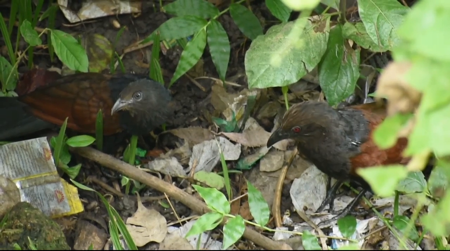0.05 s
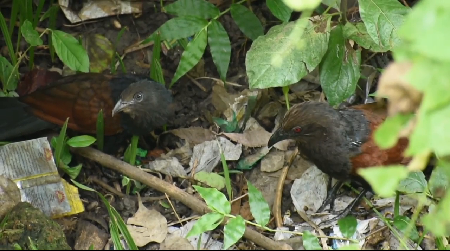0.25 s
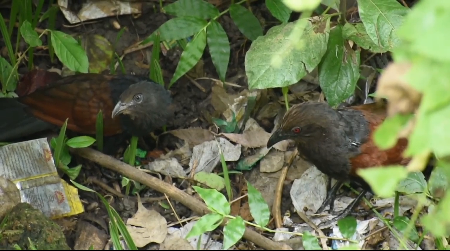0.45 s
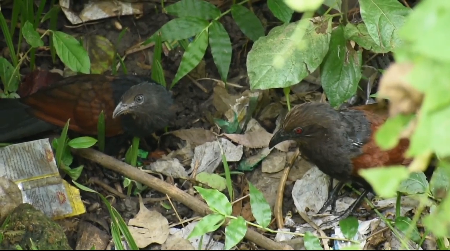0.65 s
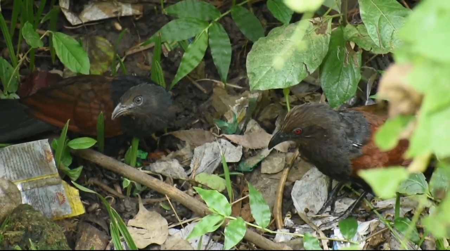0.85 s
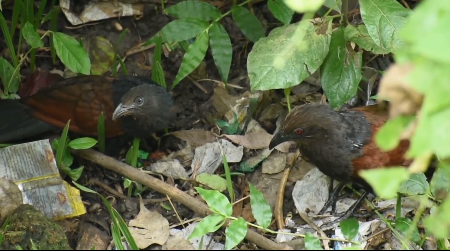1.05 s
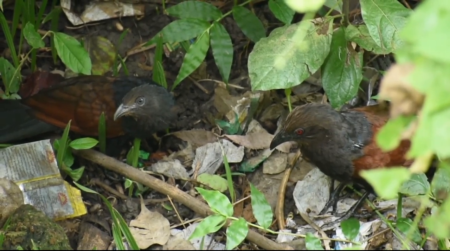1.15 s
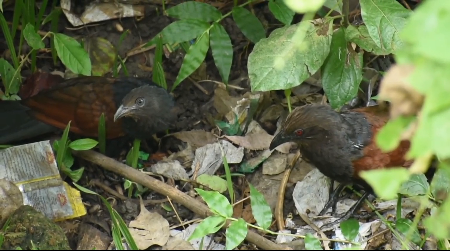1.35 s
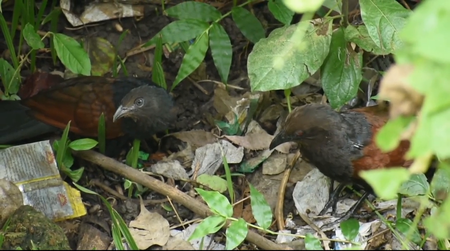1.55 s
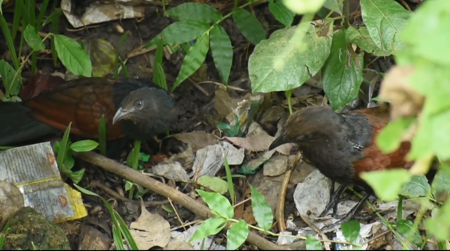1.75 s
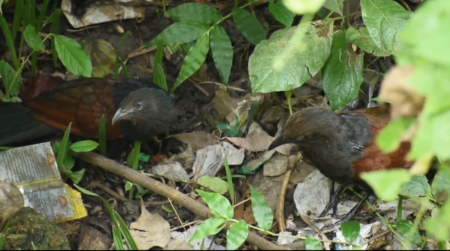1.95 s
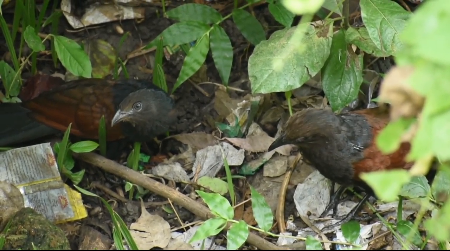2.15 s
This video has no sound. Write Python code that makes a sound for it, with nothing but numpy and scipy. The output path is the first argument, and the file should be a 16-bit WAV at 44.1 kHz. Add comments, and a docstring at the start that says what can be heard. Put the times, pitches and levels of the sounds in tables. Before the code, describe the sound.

Several birds call in undergrowth, with small tweets scattered throughout. A close bird hoots low at about 0.2 and 0.6 seconds, the loudest sounds. Five evenly paced chirps run until 1.3 seconds, with high pips on the left. Two thin squeals come near 1 and 1.2 seconds, and a farther bird rasps at 1 and 1.6 seconds. Light wind rumbles on the microphone over a soft hiss.

```python
"""In undergrowth, on a stereo microphone; light wind rumbles on it and foliage gives each call a short tail.
Small birds tweet, chirp and zip from the start. A coucal, close by, hoots low twice in the first second,
with pips and a peep off to the left. Around the one-second mark come two thin squeals, and a farther
bird gives the first of two rasping calls; scattered tweets carry on to the end.
The recorder's crude change of sample rate adds faint metallic images to every call."""
import sys
import numpy as np
from scipy import signal
from scipy.fft import rfft, irfft
from scipy.io import wavfile
from scipy.ndimage import uniform_filter1d, map_coordinates

SR = 44100
rng = np.random.default_rng(int(sys.argv[2]) if len(sys.argv) > 2 else 0)


def materialize(psi):
    """Save the field psi as 16-bit PCM at rate SR to the path in sys.argv[1].

    A 1-D psi becomes a single channel; in a 2-D psi each row is a channel.
    """
    bounded = np.clip(np.atleast_2d(psi).T, -1, 1)
    quanta = np.round(bounded * 32767).astype(np.int16)
    wavfile.write(sys.argv[1], SR, quanta)


N = 97020
LEAD = SR // 4  # samples of run-in, so that earlier calls still echo at the start
TIME = np.arange(N) / SR


def amp(db):
    """Decibels to amplitude."""
    return 10 ** (np.asarray(db) / 20)


def unit(x):
    """Scales to rms 1."""
    return x / np.sqrt(np.mean(x ** 2) + 1e-20)


def at_hz(points, hz):
    """Reads a spectrum on a log-frequency axis."""
    f, value = np.transpose(points)
    return np.interp(np.log(hz + 1), np.log(f + 1), value)


def follow(points):
    """Start time and each column of a curve, sample by sample."""
    s, *columns = np.transpose(points)
    t = np.arange(s[0], s[-1], 1 / SR)
    return s[0], [np.interp(t, s, c) for c in columns]


def drift(size, hz):
    """Random wander below hz, of rms about 1."""
    f = np.fft.rfftfreq(SR, 1 / SR)
    return unit(irfft(rfft(rng.standard_normal(SR)) / (1 + (f / hz) ** 4)))[:size]


def pan(balance_db):
    """Left and right gains; positive leans left."""
    return np.array([amp(balance_db / 2), amp(-balance_db / 2)])


def add(mix, start, sound, balance_db, lead_s=0):
    """Places a sound; it reaches the left channel lead_s before the right."""
    right = map_coordinates(sound, [np.arange(len(sound)) - lead_s * SR], order=3)
    part = mix[:, LEAD + round(start * SR):][:, :len(sound)]
    part += (pan(balance_db)[:, None] * [sound, right])[:, :part.shape[1]]


def noise_pair(spectrum, likeness, balance_db, patchy_db):
    """Two partly alike channels of coloured noise with drifting patches, at rms 1."""
    hz = np.fft.rfftfreq(2048, 1 / SR)
    a, b, c, d, patches = rng.standard_normal((N // 512 + 5, len(hz), 5)).T
    patches = unit(uniform_filter1d(uniform_filter1d(patches, size=24, axis=0), size=5, axis=1))
    alike = np.clip(at_hz(likeness, hz), -1, 1)[:, None]
    left = a + 1j * b
    right = alike * left + np.sqrt(1 - alike ** 2) * (c + 1j * d)
    gain = amp(at_hz(spectrum, hz)[:, None] + patchy_db * patches) * pan(at_hz(balance_db, hz))[..., None]
    return unit(signal.istft(gain * [left, right], nperseg=2048, noverlap=1536)[1][:, :N])


def air():
    """Soft hiss of air and leaves all around."""
    spectrum = [(70, -32.5), (120, -5), (225, -5), (340, -5), (490, -5), (700, -10), (1100, -12.5),
                (1700, -14), (2500, -15.5), (3700, -19), (4800, -19.5), (11000, -27), (15500, -28.5)]  # hiss colour: f/Hz, relative density/dB
    likeness = [(100, 0.074), (500, 0.2), (1500, 0.51), (5000, 0.18), (15000, 0.16)]  # stereo image: f/Hz, left-right correlation
    balance = [(100, 1), (500, 1), (2000, 1.6), (15000, 1.6)]  # lean: f/Hz, left over right/dB
    swell = [(0, -55), (.3, -52.5), (.7, -54.5), (.84, -53.5), (1.02, -51.5), (1.24, -54.5), (1.42, -53.5),
             (1.8, -56.5), (2.2, -57.5)]  # rise and fall: t/s, level/dB
    return noise_pair(spectrum, likeness, balance, patchy_db=3) * amp(np.interp(TIME, *np.transpose(swell)))


def wind():
    """Lumpy wind on the microphone, mostly on the left port."""
    spectrum = [(8, -1.5), (25, 2.5), (45, -8), (65, -15.5), (100, -21.5), (160, -34), (400, -74),
                (2000, -100)]  # rumble colour: f/Hz, relative density/dB
    gusts = [(0, -46), (.08, -45.5), (.17, -46), (.24, -46.5), (.42, -47.5), (.72, -44), (.95, -47.5),
             (1.03, -32), (1.2, -43.5), (1.39, -38), (1.58, -44.5), (1.77, -42.5), (1.86, -46.5),
             (2.03, -33.5), (2.2, -50.5)]  # gust strength: t/s, relative level/dB
    rumble = noise_pair(spectrum, likeness=[(25, 0.71), (120, 0.23)],
                        balance_db=[(30, 10.1), (120, 5.2)], patchy_db=2.5)
    return rumble * amp(5 + np.interp(TIME, *np.transpose(gusts)))


def whistle(hz, level_db, octave_db, rough=0, edge_s=.002, jitter=.0013):
    """A nearly pure syrinx tone with a weak octave and soft ends; roughness makes its strength flutter."""
    t = np.arange(len(hz)) / SR
    phase = 2 * np.pi * np.cumsum(hz * (1 + jitter * drift(len(hz), hz=236))) / SR
    edges = np.clip(np.minimum(t, t[-1] - t) / edge_s, 0, 1)
    flutter = (1 + rough * drift(len(hz), hz=200)) / np.hypot(1, rough)
    overtone = amp(octave_db + 47 * np.log2(hz / hz.mean()))  # grows as the note is pushed higher
    return flutter * edges * amp(level_db) * np.sqrt(2) * (np.sin(phase) + overtone * np.sin(2 * phase))


def foliage(dry, wet_db, near_db, near_s=.017, gap_s=.0088, echoes_per_s=2500):
    """Adds quick echoes from the nearest leaves, then the scatter from farther ones, dying band by band."""
    decay = [(200, 0.33), (400, 0.47), (2500, 0.57), (5000, 0.6), (8000, 0.3), (15000, 0.57)]  # tail of the leaves: f/Hz, time to fall 60 dB/s
    size = SR // 2
    t = np.arange(size) / SR
    taps = rng.choice([-1., 1.], (2, size)) * (rng.random((2, size)) < echoes_per_s / SR) * (t > gap_s)
    hz, s, bands = signal.stft(taps, SR, nperseg=256)
    tail = signal.istft(bands * amp(-60 * s / at_hz(decay, hz)[:, None]), SR, nperseg=256)[1][:, :size]
    near = rng.standard_normal((2, size)) * (t > .001) * (t < near_s)
    echoes = (amp(wet_db) * unit(tail) + amp(near_db) * unit(near)) / np.sqrt(size)
    return (dry + signal.fftconvolve(dry, echoes, axes=1)[:, :dry.shape[1]])[:, LEAD:LEAD + N]


def bird(shape, calls, balance_db, octave_db, wet_db, near_db, lead_s=0, rough=0):
    """One bird in the leaves whistles its shape, scaled to each call's length, pitch and strength."""
    out = np.zeros((2, LEAD + N))
    s, hz, db = np.transpose(shape)
    for start, length, ratio, level_db in calls:
        shape_s = np.linspace(0, s[-1], round(length * SR))
        pitch = uniform_filter1d(np.interp(shape_s, s, hz), size=len(shape_s) // 16)
        note = whistle(ratio * pitch, level_db + np.interp(shape_s, s, db), octave_db, rough)
        add(out, start, note, balance_db, lead_s)
    return foliage(out, wet_db, near_db)


def coucal(echo_s=.052, echo_db=-31):
    """Low hoots close to the microphone, each thrown back once by the undergrowth."""
    shape = [(0, 365, -29.5), (.004, 373, -15.5), (.009, 420, -7.5), (.014, 437, -3.5), (.02, 431, -1.7),
             (.033, 382.5, 1), (.046, 356, 1.1), (.064, 354.2, 0.4), (.096, 376.8, 3), (.108, 396, -2.5),
             (.114, 360, -12), (.121, 335, -37.5)]  # one hoot: t/s, f/Hz, relative level/dB
    calls = [(-.132, 0.12, 1.04, -15), (.228, 0.12, 1, -18), (.56, 0.12, .968, -19)]  # hoots: t/s, length/s, pitch ratio, level/dB
    hoots = bird(shape, calls, balance_db=5.4, octave_db=-38.5, wet_db=-22.5, near_db=-35.5)
    echo = np.array([np.interp(TIME - echo_s, TIME, side, left=0) for side in hoots])
    return hoots + amp(echo_db) * echo


def tweets():
    """Brief gliding notes from birds scattered through the bushes."""
    # Notes: t/s, length/s, first f/Hz, middle f/Hz, last f/Hz, mid-note level/dB, left over right/dB
    notes = [(-.02, 0.081, 4600, 5130, 6500, -56, 12), (-.01, 0.036, 3710, 3540, 3320, -59, 10),
             (0.622, 0.05, 3360, 3380, 3160, -57, 8.5), (0.071, 0.017, 3420, 3371, 3250, -55, 11),
             (0.123, 0.012, 3440, 3330, 3240, -56.5, 20), (0.177, 0.019, 3430, 3374, 3430, -55.5, 11.5),
             (0.234, 0.0099, 3680, 3690, 3618, -51, 16), (0.272, 0.024, 4540, 4400, 4440, -51, 2.5),
             (0.298, 0.024, 4760, 4650, 4560, -52, 3), (0.446, 0.018, 3710, 3615, 3513, -54, 18),
             (0.486, 0.033, 3390, 3390, 4000, -52, 4.5), (0.534, 0.014, 3560, 3325, 3224, -53, 14),
             (0.584, 0.038, 3480, 3686, 3550, -56.5, 5), (0.925, 0.017, 3620, 3520, 3520, -54, 12),
             (.973, 0.0098, 3495, 3380, 3250, -53, 10.5), (1.014, 0.026, 3370, 3367, 3370, -57.5, 16),
             (1.082, 0.017, 3416, 3278, 3193, -57, 18), (1.121, 0.015, 3640, 4220, 5300, -54.5, 3),
             (1.441, 0.052, 4210, 4750, 5180, -62, 7), (1.88, 0.078, 6180, 6230, 6040, -65, 2),
             (1.95, 0.023, 6030, 5720, 5540, -58, 5), (1.961, 0.017, 2810, 3100, 3210, -61.5, 0),
             (1.993, 0.037, 3360, 3380, 3380, -64, 9.5), (2.055, 0.0144, 5500, 5404, 5400, -63, 1),
             (2.176, 0.035, 4780, 4694, 4400, -65, 17)]
    out = np.zeros((2, LEAD + N))
    for start, length, first, middle, last, level_db, balance_db in notes:
        progress = np.linspace(0, 1, round(length * SR))
        hz = np.polyval(np.polyfit([0, .5, 1], [first, middle, last], 2), progress)
        arch_db = level_db - 8 * (2 * progress - 1) ** 2
        add(out, start, whistle(hz, arch_db, octave_db=-23, rough=.38), balance_db, lead_s=4e-5)
    return foliage(out, wet_db=-5, near_db=-8)


def chirps():
    """Five evenly paced whistles, left of centre, that leap up and sag."""
    shape = [(0, 2160, -5.5), (.009, 2700, -4.5), (.017, 2824, 2), (.032, 2737, 0.5), (.052, 2603, 1),
             (.068, 2550, -0.5), (.078, 2404, -14)]  # one chirp: t/s, f/Hz, relative level/dB
    calls = [(.02, 0.077, 0.98, -55.5), (.316, 0.073, 1, -51), (.62, 0.074, 1.008, -49),
             (.914, .076, 1, -48.5), (1.204, .076, 1.01, -48)]  # chirps: t/s, length/s, pitch ratio, level/dB
    return bird(shape, calls, balance_db=7.5, octave_db=-38.5, wet_db=-10, near_db=-8)


def zips():
    """Three faint, high whistles that flick up and plunge."""
    shape = [(0, 6760, -15), (.007, 8200, -5), (.012, 8300, -2), (.018, 7000, 2.5), (.024, 5500, 3.5),
             (.03, 4940, -1.5)]  # one zip: t/s, f/Hz, relative level/dB
    calls = [(.086, 0.034, 1.08, -63.5), (.144, 0.029, 1.03, -61), (.201, 0.033, 1, -59.5)]  # zips: t/s, length/s, pitch ratio, level/dB
    return bird(shape, calls, balance_db=2.5, octave_db=-53, wet_db=-8.5, near_db=-3.5)


def pips():
    """Two falling, fluttering whistles well to the left."""
    shape = [(0, 5350, -9), (.005, 5050, -1), (.02, 4975, 1.5), (.035, 4900, 0.5), (.05, 4760, -6.5),
             (.06, 4560, -10), (.068, 4250, -12.5)]  # one pip: t/s, f/Hz, relative level/dB
    calls = [(.322, .064, 0.99, -41.5), (.799, .07, 0.99, -41)]  # pips: t/s, length/s, pitch ratio, level/dB
    return bird(shape, calls, balance_db=14.5, octave_db=-27, wet_db=-9, near_db=-7.5,
                lead_s=3.6e-5, rough=.22)


def peep():
    """One short, almost level whistle well to the left."""
    shape = [(0, 4520, -3.5), (.006, 4504, 4), (.013, 4500, 1), (.022, 4457, -4)]  # the note: t/s, f/Hz, relative level/dB
    calls = [(.695, 0.025, 1, -49)]  # its entry: t/s, length/s, pitch ratio, level/dB
    return bird(shape, calls, balance_db=16, octave_db=-39.5, wet_db=-9, near_db=-21, lead_s=4e-5)


def squeals(warble_hz=100.1, crack_hz=190, crack_db=-17, strain_s=.017, hiss_db=-22):
    """A hoarse warble of rising sweeps settles into a thin high whistle that cracks and hisses as it ends."""
    curves = [
        [(.922, 6595, -47, 1200), (.931, 6900, -48.5, 1296), (.944, 7410, -43.5, 1197.5),
         (.958, 8300, -59, 147.5), (.967, 7720, -50, 5), (.979, 7075, -37.5, 6), (.998, 6910, -38, 8),
         (1.015, 6850, -39.5, -16), (1.018, 6846, -33.5, -3), (1.025, 7130, -35, 11), (1.031, 6800, -44, 0)],
        [(1.143, 6260, -50, 1087), (1.155, 6600, -50, 1297), (1.166, 7200, -42.5, 1100),
         (1.176, 8380, -57.5, 147), (1.186, 7850, -45.5, 15), (1.194, 7238, -41.5, -2), (1.215, 7180, -30.5, 6),
         (1.225, 7020, -34, -3), (1.24, 7070, -38, 7), (1.244, 7060, -34, 0)],
    ]  # one curve a squeal: t/s, f/Hz, relative level/dB, warble depth/Hz
    out = np.zeros((2, LEAD + N))
    for curve in curves:
        start, (hz, db, depth) = follow(curve)
        size = len(hz)
        t = np.arange(size) / SR
        sweep = signal.sawtooth(2 * np.pi * warble_hz * t, width=.9)
        hoarse = np.clip(.6 * depth / depth.max(), 0, 1)
        strain = np.exp(-((t[-1] - t) / strain_s) ** 4)  # rises over the last stretch
        flutter = np.sqrt(1 - hoarse) + np.sqrt(hoarse) * drift(size, hz=1100)
        crack = drift(size, hz=260) + 2 * strain * np.sin(2 * np.pi * crack_hz * t)
        flutter *= 1 + amp(crack_db) * crack
        hiss = strain * amp(db + hiss_db) * rng.standard_normal(size)
        tone = whistle(hz + depth * sweep, db - 1.5, octave_db=-40)
        add(out, start, hiss + flutter * tone, balance_db=3.5)
    return foliage(out, wet_db=-11, near_db=-12)


def beak(source, hz, width_hz=950):
    """A moving resonance: two poles in series, each width_hz wide, ride on hz; output at rms 1."""
    turn = np.exp(2j * np.pi * np.cumsum(hz) / SR)
    pole = np.exp(-np.pi * width_hz / SR)
    return unit((turn * signal.lfilter([1], np.poly([pole, pole]), source / turn)).real)


def rasps(rattle_hz=92, pitch_swing=.11, level_swing=.25):
    """A farther bird's voice rings its beak; where it turns rough, a rattle shakes it and hiss joins in."""
    # One curve a rasp: t/s, voice f/Hz, beak resonance f/Hz, level/dB, roughness (capped at 1)
    curves = [
        [(1.0, 538, 1300, -62.5, 1.1), (1.055, 534.8, 1590, -49, 0.78), (1.11, 503, 1540, -52, 0.68),
         (1.18, 485.8, 1630, -48, 0.15), (1.235, 449, 1702, -49.5, 0.77), (1.29, 437, 1510, -56, 1),
         (1.315, 436, 1446, -68, 1)],
        [(1.614, 458, 1410, -50, 0.26), (1.62, 471, 1420, -52.5, 0.2), (1.626, 484.8, 1520, -56.5, 1),
         (1.66, 521.6, 1640, -54, 1), (1.71, 530.8, 1520, -53, 0.47), (1.78, 502.2, 1680, -54.5, 0.65),
         (1.84, 476, 1820, -54.5, 0.6), (1.888, 462, 1710, -56.5, 0.8), (1.912, 448, 1600, -75, 0.9)],
    ]
    hiss_band = signal.butter(4, [850, 2200], "bandpass", fs=SR, output="sos")
    out = np.zeros((2, LEAD + N))
    for curve in curves:
        start, (hz, beak_hz, db, rough) = follow(curve)
        size, rough = len(hz), np.clip(rough, 0, 1)
        rattle = rough * np.cos(2 * np.pi * np.cumsum(rattle_hz * (1 + .078 * drift(size, hz=34))) / SR)
        phase = 2 * np.pi * np.cumsum(hz * (1 + pitch_swing * rattle + .006 * drift(size, hz=83))) / SR
        voice = unit(sum(np.cos(k * phase) / np.sqrt(k) for k in range(1, 5)))
        hiss = signal.sosfilt(hiss_band, rng.standard_normal(size))
        shake = 1 + level_swing * rattle
        hiss_share = .5 * rough
        voiced = np.sqrt(1 - hiss_share) * beak(voice * shake, beak_hz)
        hoarse = np.sqrt(hiss_share) * beak(hiss * shake, beak_hz)
        add(out, start, amp(db) * (voiced + hoarse), balance_db=4)
    return foliage(out, wet_db=-9, near_db=-8)


def scene():
    """Air, wind and birds as they reach the microphone."""
    return air() + wind() + coucal() + tweets() + chirps() + zips() + pips() + peep() + squeals() + rasps()


def record(dry, sensor_hz=48000, cutoff_hz=15600):
    """Dropping samples to lower the rate mirrors each tone at 3.9 kHz steps; then treble lift, band limit."""
    treble_lift = [(2500, -1), (3500, -0.5), (7000, 0.5), (11000, 3), (15000, 1)]  # recorder response: f/Hz, gain/dB
    fast = signal.resample(dry, round(N * sensor_hz / SR), axis=1)
    dropped = fast[:, np.arange(N) * sensor_hz // SR]
    bright = irfft(rfft(dropped) * amp(at_hz(treble_lift, np.fft.rfftfreq(N, 1 / SR))), N)
    lowpass = signal.firwin(511, cutoff_hz, window=("kaiser", 9), fs=SR)
    return signal.oaconvolve(bright, lowpass[None], "same")


dry = scene()
out = record(dry)
materialize(out)
```